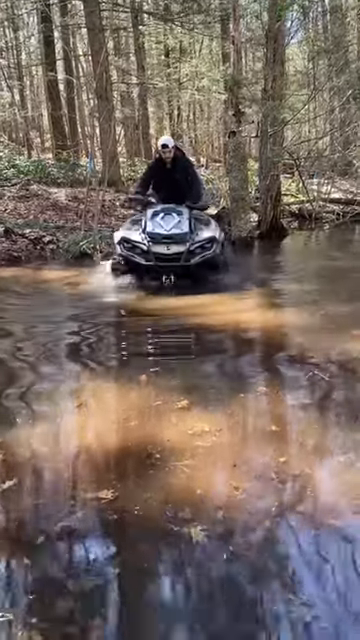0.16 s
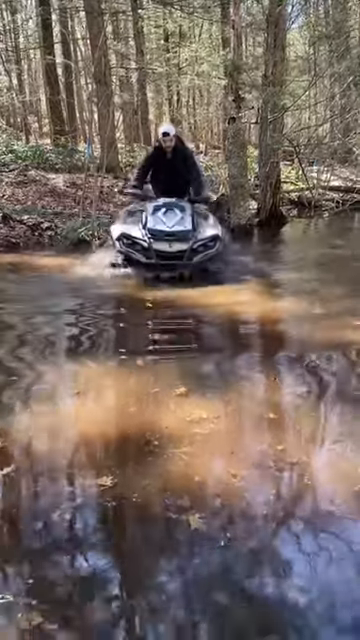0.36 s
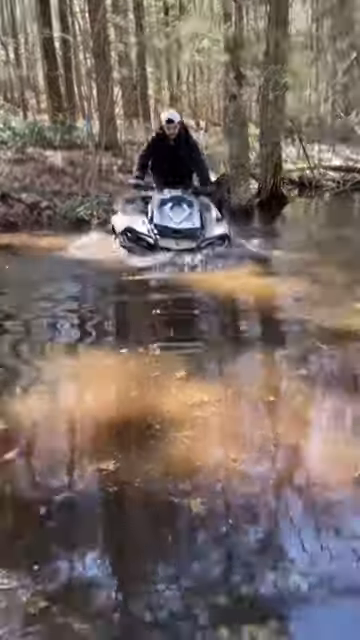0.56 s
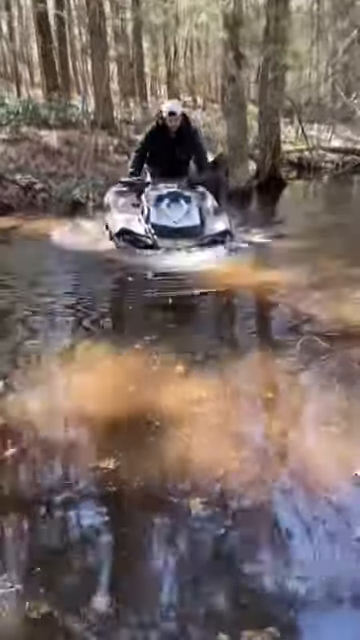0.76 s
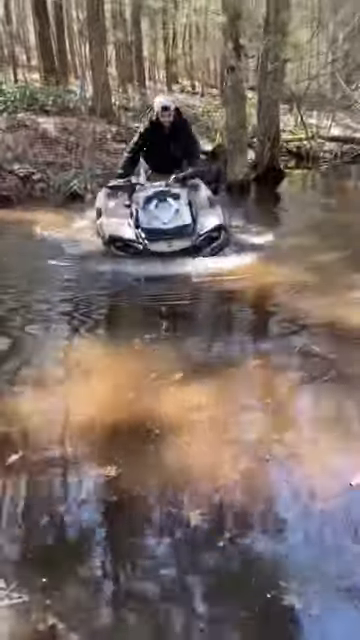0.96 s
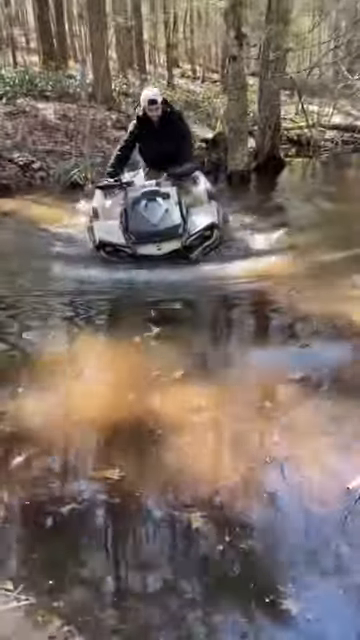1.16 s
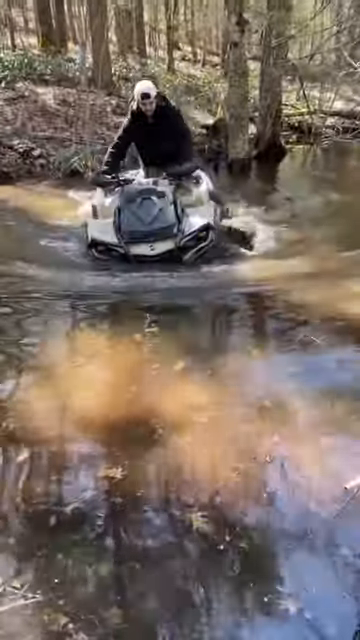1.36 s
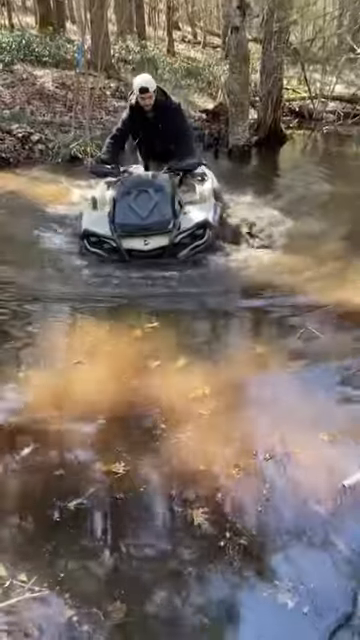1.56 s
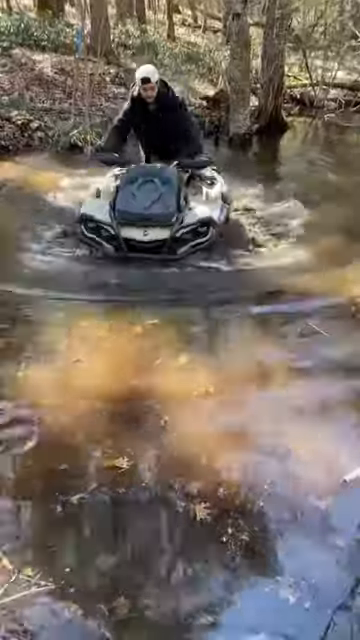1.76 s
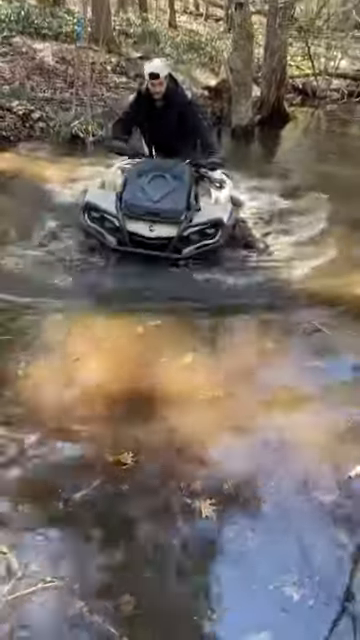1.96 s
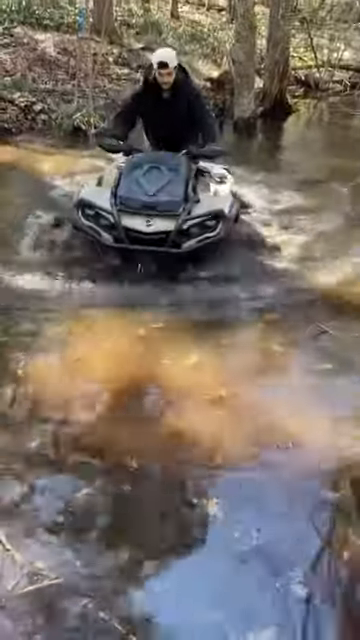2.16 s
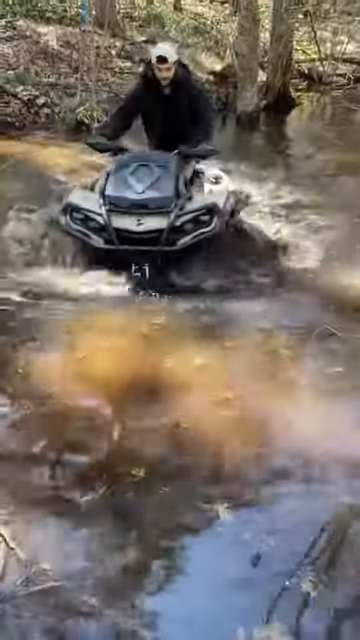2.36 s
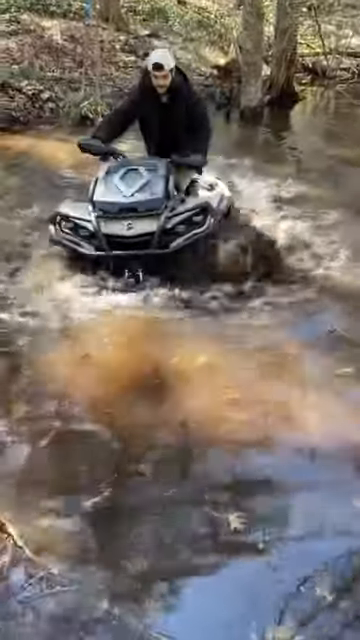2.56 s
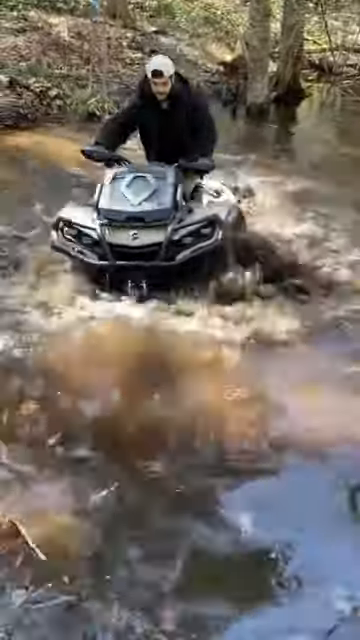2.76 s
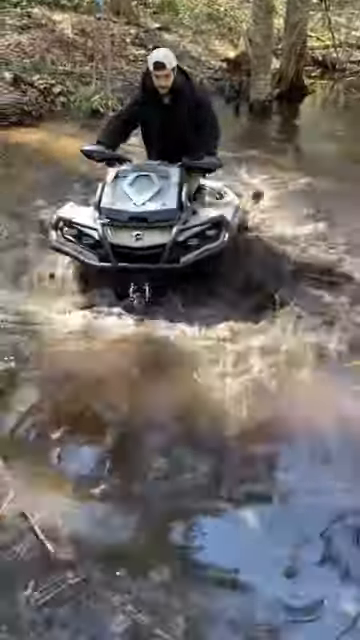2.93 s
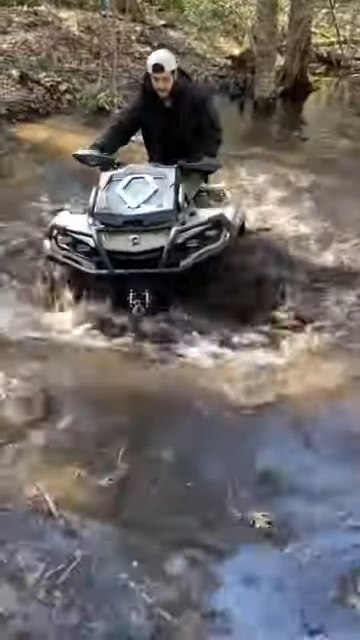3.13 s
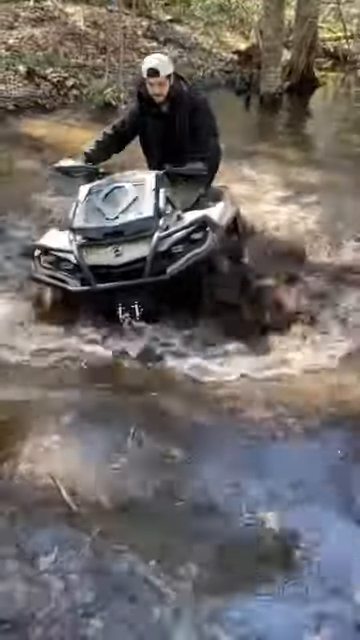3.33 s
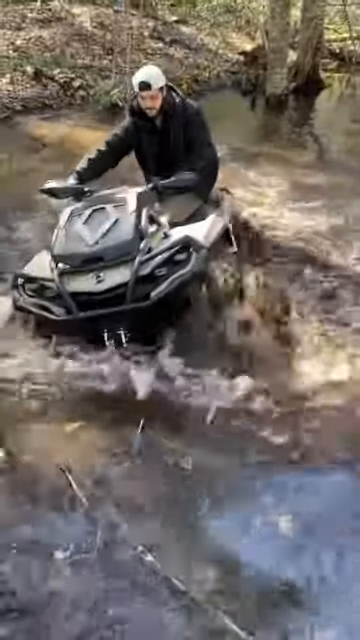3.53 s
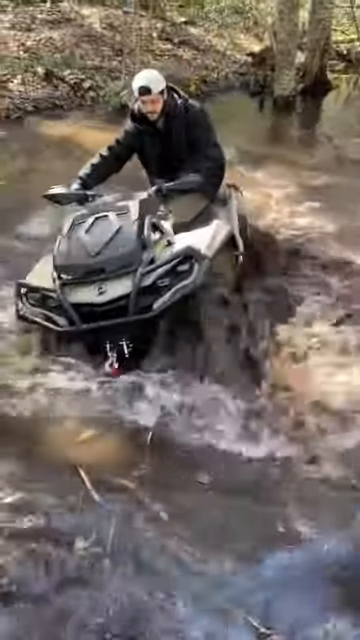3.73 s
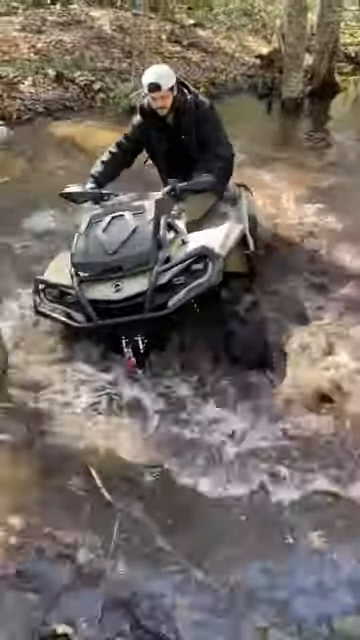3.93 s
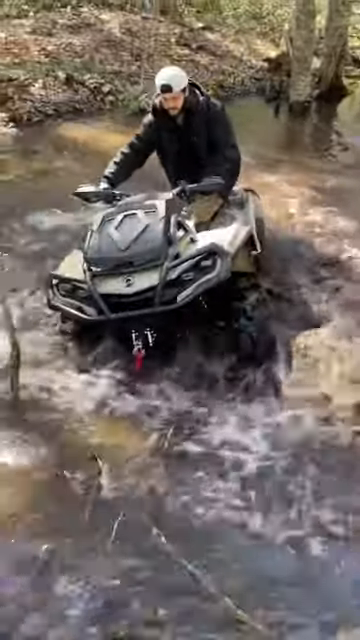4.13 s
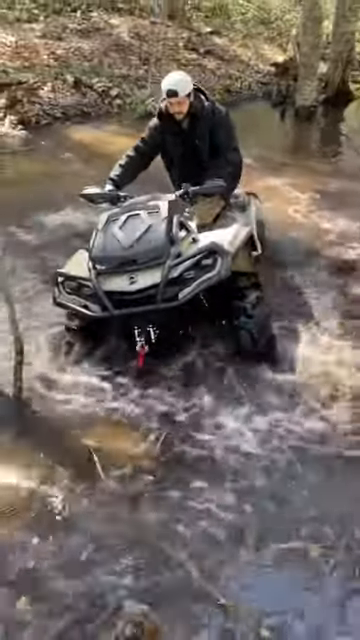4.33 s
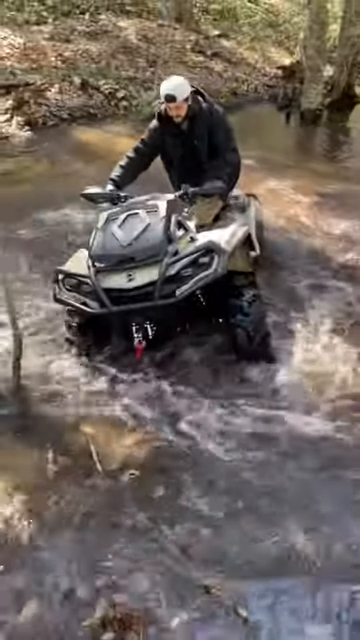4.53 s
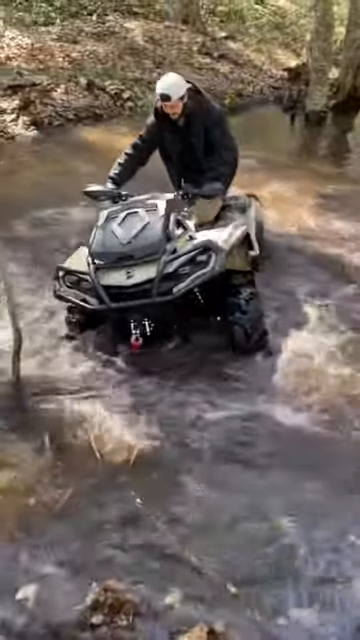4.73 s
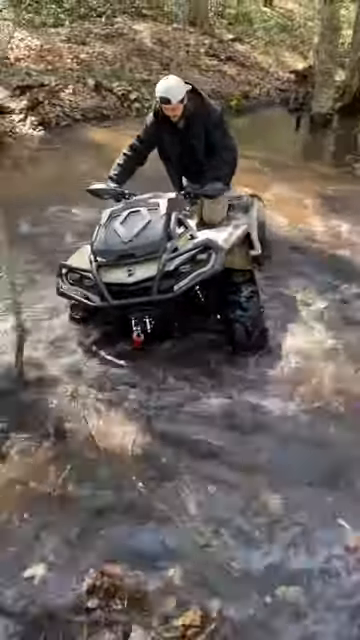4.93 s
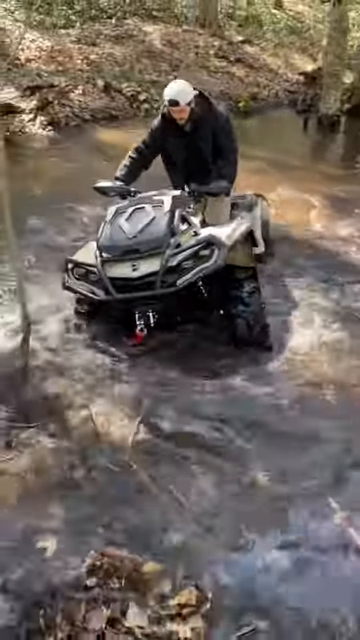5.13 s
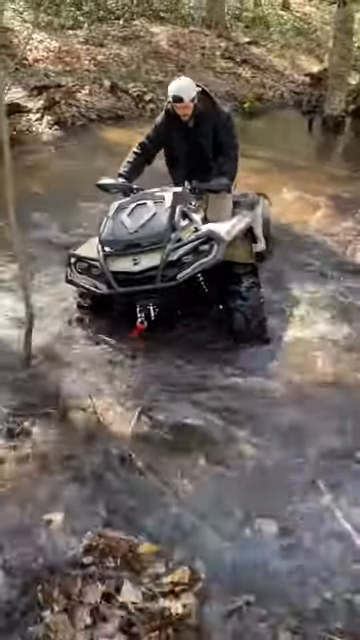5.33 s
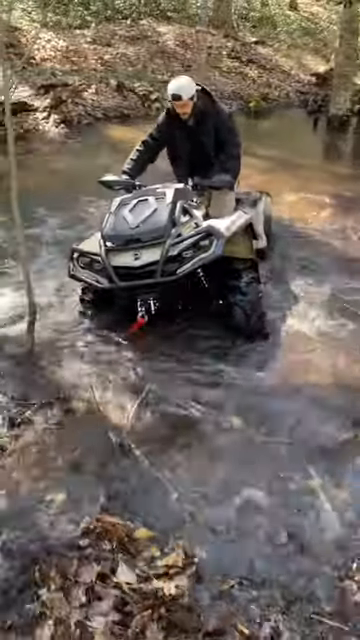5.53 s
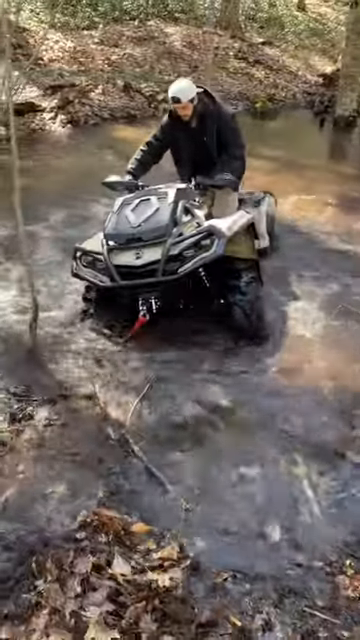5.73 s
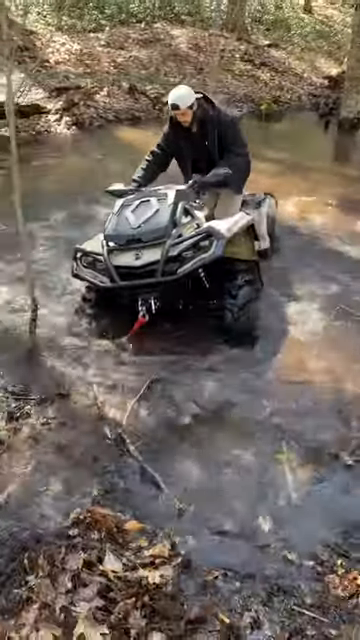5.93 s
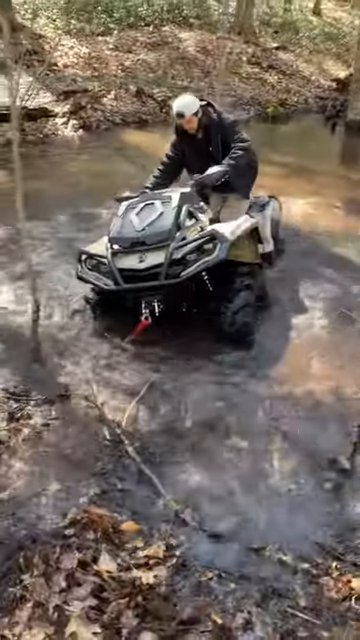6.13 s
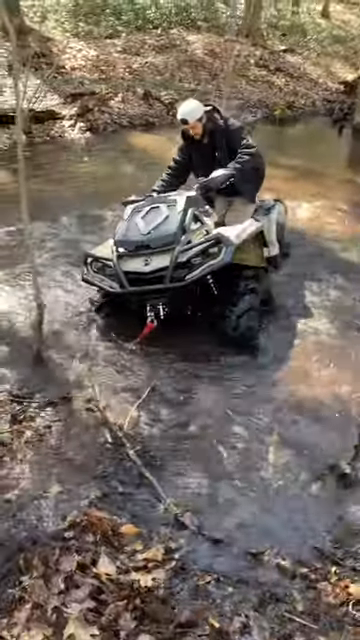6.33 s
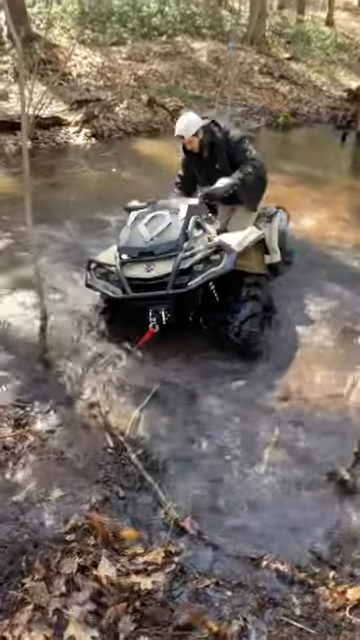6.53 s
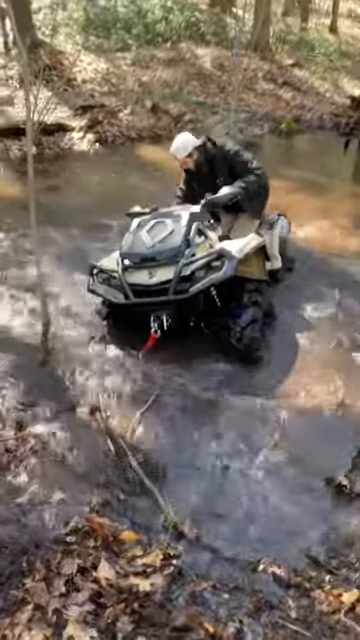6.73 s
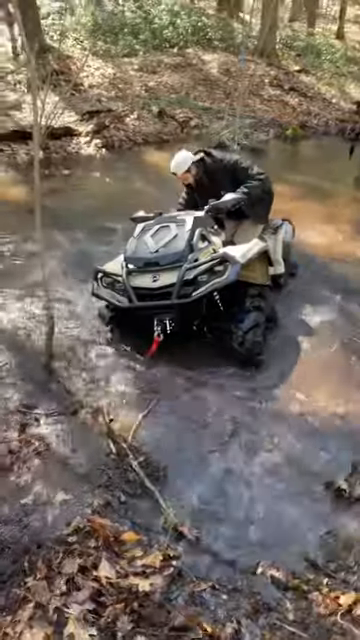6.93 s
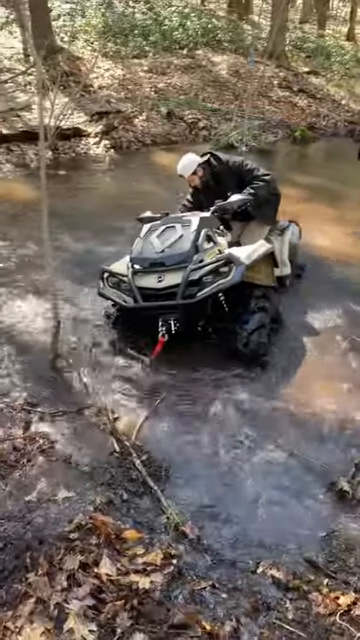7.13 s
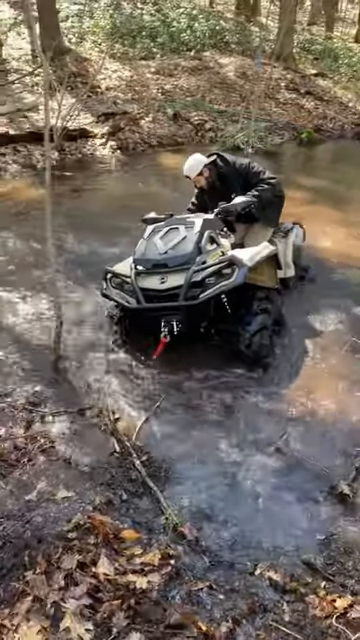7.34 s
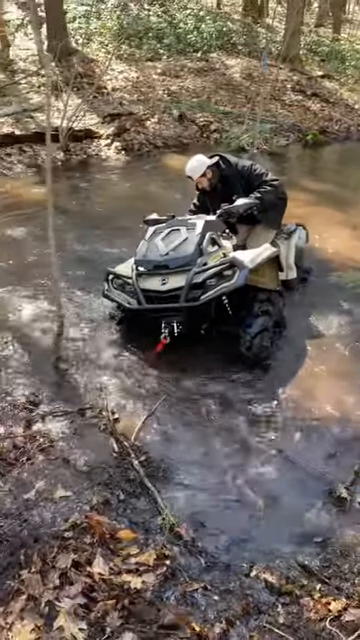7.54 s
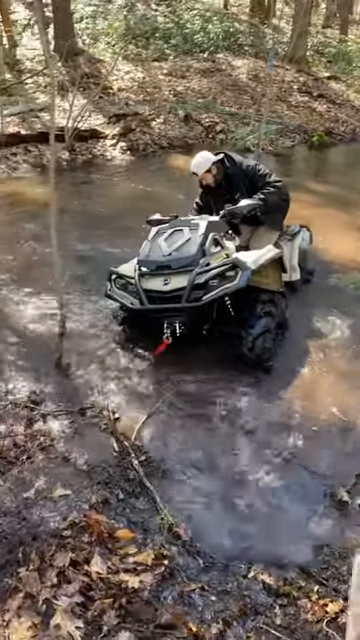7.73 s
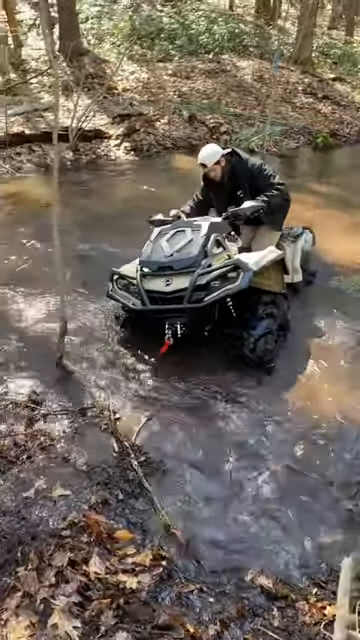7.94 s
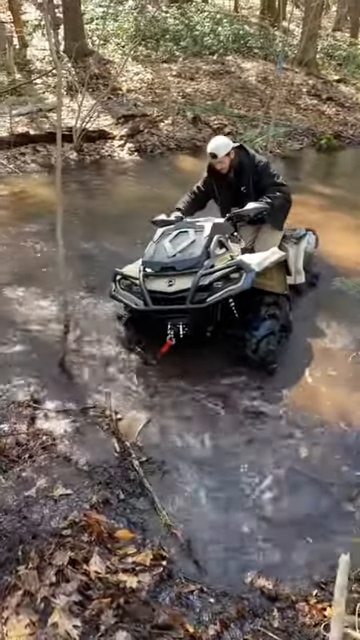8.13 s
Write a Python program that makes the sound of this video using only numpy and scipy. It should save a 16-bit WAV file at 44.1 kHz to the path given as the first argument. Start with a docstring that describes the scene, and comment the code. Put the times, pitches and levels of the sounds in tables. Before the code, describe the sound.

A rough twin-cylinder engine revs and surges nearer through splashing water, cuts back to slow underwater glugs, and ends with gear lever clunks.

```python
"""A V-twin quad bike fords a shallow creek in the woods, nearing the microphone with blips of the throttle.
Its exhaust is a sum of orders of the engine cycle; knocks and hiss ring the casing. Then the throttle
closes and the idling engine sends slugs of gas, made of rising bubbles, out of the drowned pipe.
The wheels' bow wave is flickering noise, bubbles and drops; it drains away and slaps against the body.
Behind it lie dull echoes from trunks and banks and the low rush of the creek."""
import sys
import numpy as np
from scipy import signal
from scipy.fft import rfft, irfft
from scipy.io import wavfile

SR = 44100
rng = np.random.default_rng(int(sys.argv[2]) if len(sys.argv) > 2 else 0)


def store_pcm(level_fs):
    """Save levels as 16-bit WAV."""
    pcm = np.round(np.clip(level_fs, -1, 1) * 32767).astype(np.int16)
    wavfile.write(sys.argv[1], SR, np.atleast_2d(pcm).T)


N = 365588
TIME = np.arange(N) / SR

# engine speed: t/s, speed [four-stroke cycles per s]
ENGINE_SPEED = [(0, 23.69), (.15, 25.26), (.39, 27.98), (.61, 28.84), (.76, 27.75), (.94, 28.07),
                (1.15, 33.73), (1.28, 34.96), (1.43, 30.8), (1.55, 29.34), (1.7, 31.97), (1.88, 36.0),
                (2.08, 33.12), (2.3, 37.37), (2.5, 36.87), (2.6, 34.19), (2.76, 28.99), (2.89, 31.87),
                (3.05, 33.49), (3.2, 34.05), (3.3, 33.4), (3.42, 25), (3.55, 15), (3.68, 18.3),
                (3.85, 19.5), (4.02, 16.5), (4.16, 12), (4.35, 12.2), (4.85, 10.5), (5.4, 10.6),
                (5.9, 9.65), (6.15, 10.2), (6.33, 11.8), (6.53, 9), (6.73, 10.6), (6.93, 10.4), (7.1, 11.7),
                (7.3, 10.4), (8.29, 10.4)]
# exhaust gas boiling up through the water, before gains: t/s, rumble level/dB, gurgle level/dB
GAS_BOILING = [(0, -44, -30), (1.6, -35, -27.5), (2.5, -23, -22.5), (3.3, -19, -23.5), (3.58, -28, -28.5),
               (3.83, -21, -20), (4.1, -30, -23), (4.26, -37.5, -28), (4.36, -29, -25.5), (4.44, -31, -36),
               (4.53, -24, -29), (4.85, -19.5, -28), (5.45, -26.5, -29.5), (5.75, -25.5, -30),
               (5.85, -31.5, -37), (6.3, -29.5, -32), (6.8, -27, -31), (7.4, -29.5, -31.5),
               (8.29, -29.5, -32)]


def from_db(db):
    """Amplitude ratio of a level in dB."""
    return 10 ** (np.asarray(db) / 20)


def rms_one(x):
    """Scale a sound to rms 1."""
    return x / np.sqrt(np.mean(x ** 2) + 1e-20)


def in_time(rows):
    """Each column of a curve, joined by straight lines."""
    s, *columns = np.transpose(rows)
    return [np.interp(TIME, s, c) for c in columns]


def at_hz(points, hz):
    """A spectrum read on a log-frequency axis."""
    points = np.array(points)
    return np.interp(np.log(hz), np.log(points[:, 0]), points[:, 1])


def drift(rate):
    """Random wandering of rms 1: noise smoothed by two equal poles at rate, in Hz."""
    step = 40  # samples between the points of the slow curve
    r = np.exp(-2 * np.pi * step * rate / SR)
    noise = rng.standard_normal(N // step + 2002)
    slow = signal.lfilter([1], [1, -2 * r, r * r], noise)[2000:]  # drop the filter's start
    return np.interp(np.arange(N) / step, np.arange(len(slow)), rms_one(slow))


def band(x, low_hz, high_hz, order=2):
    """Butterworth band-pass."""
    edges = [low_hz, min(high_hz, SR / 2 - 500)]
    return signal.sosfilt(signal.butter(order, edges, "band", fs=SR, output="sos"), x)


def resonate(x, hz, width):
    """A resonance with gain 1 on top."""
    r = np.exp(-np.pi * width / SR)
    zeros = np.array([1, 0, -1]) * (1 - r * r) / 2
    poles = [1, -2 * r * np.cos(2 * np.pi * hz / SR), r * r]
    return signal.lfilter(zeros, poles, x + 1e-18)


def add(out, s, sound):
    """Mix a short sound in at time s."""
    at = int(s * SR)
    out[..., at:at + sound.shape[-1]] += sound[..., :N - at]


def hump(s, length_s):
    """A smooth rise and fall about time s, length_s wide at half height."""
    return np.exp(-np.log(2) * (2 * (TIME - s) / length_s) ** 2)


def bubble(hz, t60, swell_s, rise):
    """A pocket of gas swells and rings down; with rise above 0 it climbs in pitch as it nears the surface."""
    t = np.arange(int(1.5 * t60 * SR)) / SR
    envelope = (1 - np.exp(-(t / swell_s) ** 2)) * from_db(-60 * t / t60)
    return envelope * np.sin(2 * np.pi * hz * t * (1 + rise * t / t60))


def bubbling(low_hz, high_hz, per_s, cycles, spread_db, slope_db, count):
    """Random bubbles of many sizes, each ringing for some cycles; slope_db per octave; rms 1."""
    out = 0
    for hz in np.geomspace(low_hz, high_hz, count):
        born = np.flatnonzero(rng.random(N) < per_s / count / SR)
        size_db = spread_db * np.minimum(rng.exponential(1, len(born)), 4)
        kicks = np.zeros(N)
        kicks[born] = from_db(size_db) * rng.choice([-1, 1], len(born))
        ringing = rms_one(resonate(kicks, hz, hz / cycles))
        out = out + ringing * from_db(slope_db * np.log2(hz / low_hz))
    return rms_one(out)


def rushing(spectrum, patchy_db, flicker_rate):
    """Stereo noise in third-octave bands, flickering alone and together, each as wide as its likeness; rms 1."""
    # left-right likeness: f/Hz, correlation [1 = same in both channels]
    likeness = [(400, 0.97), (1300, 0.98), (2800, 0.76), (5400, 1), (10000, 1)]
    out, together = 0, drift(flicker_rate)
    edges = 2 ** np.arange(np.log2(spectrum[0][0]), np.log2(spectrum[-1][0]) + .1, 1 / 3)
    white = rng.standard_normal((2, 2, N))
    for k, (low, high) in enumerate(zip(edges, edges[1:])):
        mid, side = band(white[k % 2], low, high)
        hz = np.sqrt(low * high)
        alike = np.clip(at_hz(likeness, hz), -1, 1)
        flicker_db = patchy_db * (.5 * together + drift(flicker_rate))
        gain = from_db(at_hz(spectrum, hz) + flicker_db)
        out = out + gain * (np.sqrt(1 + alike) * mid + np.sqrt(1 - alike) * side * [[1], [-1]])
    return rms_one(out)


def crank():
    """Engine cycles turned so far: the running sum of the speed."""
    return .27 + np.cumsum(in_time(ENGINE_SPEED)[0]) / SR


def exhaust(turns, bark_skew=-0.68, rough_db=1.6):
    """Pressure bursts once a cycle: a clean low throb, and a rough bark that grows with speed."""
    # make-up of the bark: order, shallow-water level/dB, deep-water level/dB
    bark_orders = [(7, -13, -12), (8, 0, 1), (9, -4.5, -1), (10, -16.5, -3), (11, -8, -1.5),
                   (12, -15, -9.5), (13, -17, -13), (14, -17, -10.5), (16, -19, -21), (17, -19.5, -16.5)]
    # how hard the exhaust blows: t/s, throb level/dB, bark level/dB
    effort = [(0, -1, 5), (.35, -1.5, -3.5), (.6, -0.5, -0.5), (.85, 0, 1), (1.6, 1, -1), (1.85, 1, 1),
              (2.05, -1, -2.5), (2.3, 0, 0.5), (2.55, -5.5, 0), (2.75, -2.5, -1.5), (3.28, -3, 0),
              (3.38, -6.5, -1), (3.44, -7, -2), (3.6, -18.5, -2), (3.71, -10, -1), (3.85, -9, 4.5),
              (4.07, -15, 4), (4.2, -23, 0), (4.5, -45, -25)]
    cruise_speed = 32  # cycles per s
    bark_level_db, bark_per_speed_db = -21.5, 0.62  # at cruise, before effort; per cycle a second
    valley_hz, valley_width_hz, valley_db = 251.5, 17.7, 4.5  # the silencer swallows part of the bark
    throb_swamped_share = 0.3  # share of a swamping's loss in dB that the throb suffers too

    speed, clear_db = in_time(ENGINE_SPEED)[0], swells()
    low = throb(turns, speed) * from_db(throb_swamped_share * np.minimum(clear_db, 0))
    # as the quad wades deeper the bark fills out, and water at the pipe's mouth shakes it
    depth = np.interp(TIME, [.9, 2.5], [0, 1])
    shake = .15 + .3 * depth  # radians
    bark, power = 0, 0
    for k, shallow_db, deep_db in bark_orders:
        swallowed_db = valley_db * np.exp(-((k * speed - valley_hz) / valley_width_hz) ** 2)
        gain = from_db(shallow_db + depth * (deep_db - shallow_db) - swallowed_db)
        phase = 2 * np.pi * round(k) * turns + bark_skew + shake * drift(21)
        bark = bark + gain * from_db(rough_db * drift(8.9)) * np.cos(phase)
        power = power + gain ** 2 / 2
    bark = bark / np.sqrt(power)
    speed_db = bark_level_db + bark_per_speed_db * (speed - cruise_speed)
    bark = bark * from_db(speed_db + clear_db + depth * rough_db * drift(20.5))
    throb_db, bark_db = in_time(effort)
    return from_db(throb_db) * low + from_db(bark_db) * bark


def throb(turns, speed, skew=3.02, smear=0.37, wander_db=0.7, wading_wander_db=1.2):
    """Low orders glide through the pipe's response, its hollow and the gas pocket; the pipe smears each burst."""
    # the uneven firing favours some orders: order, level/dB
    throb_orders = [(2, 4), (3, -1.5), (4, 0), (5, -1), (6, -0.5)]
    # response of the exhaust pipe: f/Hz, level/dB
    pipe_response = [(32, -53), (58, -24), (73, -20.5), (82, -21.5), (94, -17), (120, -17.5), (160, -17.5),
                     (184, -21), (205, -18), (230, -21.5)]
    # hollow in the pipe's note while the quad wades: t/s, f/Hz, depth/dB
    hollow_curve = [(.9, 129, 4), (1.1, 125, 8), (1.55, 117.6, 11), (2, 117.5, 11), (2.4, 113, 11),
                    (2.56, 108, 12), (2.7, 119, 8), (3.3, 118, 10)]
    # resonance of the gas pocket at the pipe's mouth: t/s, f/Hz, level/dB
    pocket_curve = [(2.1, 145, -4), (2.4, 148, 5.5), (2.56, 142, 6.5), (2.68, 183, 4.5), (3.05, 168, 6.5),
                    (3.3, 166, 7), (3.36, 135, 1), (3.44, 92, 6.5), (3.53, 64, 10), (3.83, 76.4, 13),
                    (4.15, 67, 12)]
    hollow_width_hz, pocket_width_oct = 7, 0.24
    wade_from_s = 1.0  # the pipe goes under water

    wading = np.clip((TIME - wade_from_s) / 0.08 + .5, 0, 1)
    hollow_hz, hollow_db = in_time(hollow_curve)
    pocket_hz, pocket_db = in_time(pocket_curve)
    out = 0
    for k, db in throb_orders:
        hz = round(k) * speed
        hollow = hollow_db * np.exp(-((hz - hollow_hz) / hollow_width_hz) ** 2)
        pocket = pocket_db * np.exp(-(np.log2(hz / pocket_hz) / pocket_width_oct) ** 2)
        wander = (wander_db + wading * (wading_wander_db - wander_db)) * drift(9.0)
        gain = from_db(db + at_hz(pipe_response, hz) - hollow + pocket + wander)
        out = out + gain * np.cos(2 * np.pi * round(k) * turns + skew + smear * (k - 4) ** 2)
    return np.sqrt(2) * out


def swells():
    """Decibels gained or lost, in smooth humps, as the pipe's mouth lifts clear of the water or is swamped."""
    # lifted (+) or swamped (-): middle t/s, length at half height [s], level/dB
    mouth_swells = [(1.26, 0.14, -14), (2.437, 0.033, -14), (2.588, 0.11, -13.5), (2.794, .07, 1),
                    (2.91, 0.07, 5), (2.98, 0.055, -10), (3.064, 0.047, 8.5), (3.14, 0.08, -12),
                    (3.268, 0.065, 8), (3.35, 0.078, -10)]
    return sum(db * hump(s, length) for s, length, db in mouth_swells)


def rasp(turns, second_turn=.36, second_db=-4, sharpness=1.14, echo_share=0.39):
    """The two cylinders fire unevenly; each firing knocks the casing and lets out a puff of hiss."""
    # mechanical rasp of the engine, before a 1 dB cut: t/s, level/dB
    rasp_level = [(0, -30.5), (1.1, -31), (1.5, -33), (1.88, -28), (3.25, -28), (3.6, -38.5), (4.5, -56),
                  (8.29, -47)]
    # resonances of the engine and its covers: f/Hz, width/Hz, level/dB
    casing_modes = [(410, 110, 2.5), (746, 260, -2.5), (1070, 220, 0), (1313, 256, -9), (2070, 360, -18.5),
                    (3660, 130, -27.5)]
    # the engine's echo lags more as it comes nearer: t/s, lag/s
    echo_lag = [(0, 0.0017), (1.7, 0.0024), (3.5, 0.0035), (8.29, 0.0037)]

    force = 0
    for lag, db in [(0, 0), (second_turn, second_db)]:
        fired = np.floor(turns - lag)
        knocks = np.diff(fired, prepend=fired[0]) * from_db(.8 * drift(30))
        puff = np.exp(sharpness * (np.cos(2 * np.pi * (turns - lag)) - 1))
        force = force + from_db(db) * (knocks + .045 * puff * rng.standard_normal(N))
    # knocks and hiss rattle round the frame, alike on every cycle
    frame = rng.standard_normal(SR // 30) * from_db(-60 * TIME[:SR // 30] / 0.2)
    force = signal.fftconvolve(force, frame)[:N]
    ringing = 0
    for k, (hz, width, db) in enumerate(casing_modes):
        ringing = ringing + (-1) ** k * from_db(db) * resonate(force, hz, width)
    # the echo cuts notches that slide down as the quad approaches
    echo = np.interp(TIME - in_time(echo_lag)[0], TIME, ringing)
    return rms_one(ringing - echo_share * echo) * from_db(in_time(rasp_level)[0] - 1.0)


def singing(turns, waver=.75, flutter_db=3):
    """Single high orders swell and fade as the speed sweeps them through resonances of the frame."""
    # orders that sing out: order, middle t/s, length at half height [s], level/dB
    sung_orders = [(42, 0.056, 0.13, -39), (51, 0.29, 0.24, -43.5), (28, 0.53, 0.23, -41),
                   (26, 0.86, 0.29, -37), (42, .92, 0.45, -42), (30, 1.25, .15, -38),
                   (44, 1.614, 0.093, -41), (17, 1.89, .15, -31.5), (29, 1.9, .25, -37),
                   (14, 2.2, .12, -31.5), (16, 2.42, .15, -35), (14, 3.05, .1, -30)]
    level = {}
    for k, s, length, db in sung_orders:
        level[round(k)] = level.get(round(k), 0) + from_db(db) * hump(s, length)
    out = 0
    for k, gain in level.items():
        phase = 2 * np.pi * k * turns + waver * drift(23)
        out = out + gain * from_db(flutter_db * drift(20)) * np.cos(phase)
    return np.sqrt(2) * out


def whine(width_hz=70):
    """The drive belt sings in a narrow, unsteady band."""
    # whine of the belt: t/s, f/Hz, level/dB
    belt_whine = [(0, 3470, -60), (.6, 3500, -56), (.85, 3400, -46), (1.02, 3553, -56), (2.05, 3590, -68),
                  (2.6, 3470, -90)]
    hz, db = in_time(belt_whine)
    phase = 2 * np.pi * np.cumsum(hz) / SR
    return from_db(db) * (drift(width_hz) * np.cos(phase) + drift(width_hz) * np.sin(phase))


def chugs(turns, scatter=0.028, late_s=0.0012, glug_slope_db=-3.0):
    """Off the throttle the gas leaves the drowned pipe in uneven slugs, one a cycle, each a boom and a glug."""
    # what a slug's boom rings with: f/Hz, level/dB, t60/s
    boom_modes = [(60.6, -1, 0.16), (82.8, 2, 0.24)]
    # what its glug rings with, before the slope: f/Hz, level/dB, t60/s
    glug_modes = [(162.8, 2.5, 0.12), (234.4, -3, 0.07), (290, -12, 0.036), (412, -11, 0.041)]
    slug_beat_s = 4.962  # a cycle starts here
    slugs_from_s = 4.05  # the engine has slowed enough for separate slugs
    slug_boom_db, slug_glug_db = 13.5, 10.5  # above the boiling's tabled rumble and gurgle
    slug_uneven_db = 0.8  # spread from slug to slug
    limp_from_s, limp_db = 6.1, 3  # late in the idle, strong and weak slugs take turns

    out = np.zeros(N)
    rumble_db, gurgle_db = in_time(GAS_BOILING)
    cycle = np.floor(turns - np.interp(slug_beat_s, TIME, turns))
    starts = np.flatnonzero((np.diff(cycle) > 0) & (TIME[1:] > slugs_from_s)) + 1
    luck = rng.standard_normal((len(starts), 9))
    for at, (late, boom_luck, glug_luck, *sizes) in zip(starts, luck):
        s = TIME[at] + late_s * late
        limp = limp_db * (s > limp_from_s) * (1 if cycle[at] % 2 else -1)
        boom_db = rumble_db[at] + slug_boom_db + limp + slug_uneven_db * boom_luck
        glug_db = gurgle_db[at] + slug_glug_db + limp + slug_uneven_db * glug_luck
        for (hz, db, t60), size in zip(boom_modes, sizes):
            boom = bubble(hz * np.exp(scatter * size / 2), t60, swell_s=0.016, rise=0.0068)
            add(out, s - .014, from_db(boom_db + db) * boom)
        for (hz, db, t60), size in zip(glug_modes, sizes[2:]):
            slope_db = glug_slope_db * np.log2(hz / glug_modes[0][0])
            glug = bubble(hz * np.exp(scatter * size), t60, swell_s=0.0034, rise=0.053)
            add(out, s, from_db(glug_db + db + slope_db) * glug)
    return out


def churn(rumble_gain_db=-5.0, gurgle_gain_db=-2):
    """Around the slugs the exhaust boils up in random big and small bubbles."""
    rumble_db, gurgle_db = in_time(GAS_BOILING)
    rumble = bubbling(61.7, 83.6, per_s=140, cycles=9.5, spread_db=1.0, slope_db=-2.0, count=3)
    gurgle = bubbling(152.7, 429.0, per_s=170, cycles=9.8, spread_db=3.0, slope_db=-9, count=10)
    return (from_db(rumble_db + rumble_gain_db) * rms_one(band(rumble, 45, 140))
            + from_db(gurgle_db + gurgle_gain_db) * rms_one(band(gurgle, 117, 586)))


def bursts(pop_db=0, pop_t60=0.034, overtone=1.91, overtone_db=-4, plink_db=0, plink_t60=0.031):
    """Big bubbles burst with a short, deep pop; large drops fall back with a plink."""
    # big bubbles bursting at the surface: t/s, level/dB, f/Hz
    pop_times = [(4.073, -12, 153), (5.153, -18, 168), (5.247, -19, 157), (5.342, -16, 159),
                 (5.494, -16, 167), (5.727, -16, 164), (6.15, -11.5, 186), (6.221, -28, 159),
                 (6.546, -14, 182), (6.617, -16, 162), (6.808, -17, 163), (6.958, -15, 144),
                 (7.557, -21, 162), (8.13, -19, 160)]
    # single drops that stand out: t/s, level/dB, f/Hz
    plink_times = [(4.942, -37, 3900), (4.99, -33, 2200), (5.021, -27, 1700), (5.04, -37, 5000),
                   (5.157, -32, 2010), (5.213, -37, 3630), (5.511, -33, 2980), (5.62, -38, 4000),
                   (6.082, -31, 1400), (6.207, -32, 2160)]
    out = np.zeros(N)
    for s, db, hz in pop_times:
        deep = bubble(hz, pop_t60, swell_s=0.00194, rise=0.11)
        upper = bubble(hz * overtone, pop_t60, swell_s=0.0027, rise=0.087)
        add(out, s, from_db(db + pop_db) * (deep + from_db(overtone_db) * upper))
    for s, db, hz in plink_times:
        add(out, s, from_db(db + plink_db) * bubble(hz, plink_t60, swell_s=0.00089, rise=0.075))
    return out


def clunks(gain_db=0, attack_s=0.0013, tail_db=-16, tail_t60=0.37):
    """The gear lever clunks home: dying noise rings the gearbox, then a faint rattle of the frame."""
    # clunks, before gain: t/s, level/dB, t60/s, tilt [dB per octave]
    clunk_times = [(7.15, -28, 0.08, -1.5), (7.201, -21.5, 0.13, -1), (7.239, -28.5, 0.17, 1.5),
                   (7.306, -22.5, 0.085, 0), (7.343, -36, 0.087, 3), (7.428, -30, .05, -3),
                   (7.443, -32, 0.098, 0), (7.51, -36, .1, -1)]
    # what the gearbox rings with: f/Hz, width/Hz, level/dB
    gearbox_modes = [(235, 56, 2), (380, 96, -2.5), (515, 78, 1.5), (654, 65, 6), (790, 60, -1),
                     (990, 160, -3), (1420, 210, -8.5), (1750, 190, -9), (2130, 320, -13),
                     (3600, 2200, -29)]
    pivot_hz = 700  # a clunk's colour tilts about this pitch
    out, t = np.zeros(N), TIME[:SR // 2]
    power = sum(from_db(db) ** 2 * np.pi * width / SR for _, width, db in gearbox_modes)
    for s, db, t60, tilt_db in clunk_times:
        decay = from_db(-60 * t / t60) + from_db(tail_db - 60 * t / tail_t60)
        envelope = decay * (1 - np.exp(-t / attack_s))
        force = from_db(db) * envelope * rng.standard_normal(len(t))
        for k, (hz, width, mode_db) in enumerate(gearbox_modes):
            gain = (-1) ** k * from_db(mode_db + tilt_db * np.log2(hz / pivot_hz))
            add(out, s, gain * resonate(force, hz, width))
    return from_db(gain_db) * out / np.sqrt(power)


def bow_wave(wash_gain_db=6.0, bubbles_db=0.2, drops_db=-2, spray_gain_db=2.5, fizz_db=-23):
    """Water churned by the wheels: a wash full of bubbles and drops, and fizzing spray."""
    # the bow wave, before gains: t/s, wash level/dB, spray level/dB
    wave_level = [(0.0, -37, -47), (0.32, -36.5, -41.5), (0.64, -39.5, -47.5), (1.31, -42.5, -48),
                  (1.71, -41.5, -47.5), (2.7, -33, -36.5), (3.12, -33, -37.5), (3.58, -33.5, -34),
                  (4.48, -43.5, -48), (6.14, -49.5, -53.5), (7.92, -50, -57), (8.29, -49, -57)]
    # bubbles and drops stand out of the wash as it nears and drains: t/s, level/dB (before gains)
    trickle_level = [(0, -11), (1.8, -8), (3.3, -1.5), (4.3, 0), (5.1, 1.5), (8.29, 0)]
    # colour of the wash, then of the spray: f/Hz, level [dB per Hz]
    wash_colour = [(350, 4.5), (500, 1), (750, -2.5), (1000, -7), (1500, -5.5), (2100, -8.5), (2700, -16.5),
                   (3500, -18)]
    spray_colour = [(2200, -30), (2900, -2), (3500, 3), (5200, 3.5), (6400, 0), (8000, -8), (11000, -1.5),
                    (13000, -4), (16000, -13)]

    wash_db, spray_db = in_time(wave_level)
    bubbles = bubbling(599.4, 2303, per_s=600, cycles=53.0, spread_db=2.5, slope_db=-5.5, count=20)
    fizz = bubbling(3300, 10500, per_s=1100, cycles=14.0, spread_db=4.5, slope_db=-4.0, count=12)
    trickle = from_db(bubbles_db) * bubbles + from_db(drops_db) * droplets()
    wash = from_db(wash_gain_db) * rushing(wash_colour, patchy_db=2.2, flicker_rate=14)
    wash = wash + from_db(in_time(trickle_level)[0]) * trickle
    spray = from_db(spray_gain_db) * rushing(spray_colour, patchy_db=1.8, flicker_rate=17.5)
    spray = spray + from_db(fizz_db) * fizz
    return from_db(wash_db) * wash + from_db(spray_db) * spray


def droplets(low_hz=800, high_hz=5500, spread_db=2.6, count=1600):
    """Drops fall back and each leaves a rising plink, the small ones higher and fainter; rms 1."""
    out = np.zeros(N)
    for when, small, luck in rng.random((count, 3)):
        hz = low_hz * (high_hz / low_hz) ** small
        db = -spread_db * np.log(luck + 0.034) - 9 * small
        add(out, when * TIME[-1], from_db(db) * bubble(hz, 30 / hz, swell_s=0.00054, rise=0.13))
    return rms_one(out)


def slaps(gulp_t60=0.043, splash_t60=0.2, body_ratio=0.62, body_t60=0.043, body_db=-1, mist_db=-17):
    """A slap traps a pocket of air that rings under a short splash; the body answers with a lower knock."""
    # water slapping and gulping against the body, before gains: t/s, level/dB, gulp f/Hz, splash level/dB
    slap_times = [(3.675, -26, 670, -24), (3.845, -18, 300, -40), (3.9, -16, 335, -40),
                  (3.95, -17, 280, -44), (3.99, -14, 348, -42), (4.03, -20, 270, -44),
                  (4.11, -13, 330, -36), (4.15, -17, 383, -52), (4.32, -20.5, 328, -50),
                  (4.662, -21, 695, -46), (5.587, -21, 496, -42), (5.755, -21, 457, -46),
                  (6.18, -16, 634, -46), (6.577, -19, 473, -40), (6.77, -24, 486, -46),
                  (6.877, -27, 640, -50), (7.704, -29, 577, -40), (8.09, -27, 653, -51),
                  (8.182, -31, 690, -43)]
    out, splash = np.zeros(N), np.zeros(N)
    t = TIME[:SR // 4]
    for s, db, hz, splash_db in slap_times:
        gulp = bubble(hz, gulp_t60, swell_s=0.0013, rise=0.098)
        knock = bubble(hz * body_ratio, body_t60, swell_s=0.0023, rise=0)
        add(out, s, from_db(db + 1.5) * gulp)
        add(out, s, from_db(db + body_db) * knock)
        add(splash, s, from_db(splash_db - 60 * t / splash_t60) * (1 - np.exp(-t / 0.00054)))
    sheet = rms_one(band(band(rng.standard_normal(N), 410, 1740), 204, 1400, order=1))
    mist = rms_one(band(rng.standard_normal(N), 2900, 4500))
    return out + 1.17 * splash * (sheet + from_db(mist_db) * mist)


def swish(s=5.65, db=-45, length_s=0.092):
    """A thin sheet of water slides off the body: a brief hump of high noise."""
    envelope = np.exp(-(2 * (TIME - s) / length_s) ** 2)
    return from_db(db) * envelope * rms_one(band(rng.standard_normal(N), 3700, 6600))


def crackles():
    """Small crackles near the microphone: brief bright ticks of noise."""
    # ticks: t/s, level/dB, t60/s
    crackle_times = [(5.982, -33.5, .02), (5.997, -39, 0.018), (6.045, -38, .015), (7.552, -36, .01),
                     (7.635, -37, .01)]
    level = np.zeros(N)
    for s, db, t60 in crackle_times:
        add(level, s, from_db(db - 60 * TIME[:SR // 4] / t60))
    return level * rms_one(band(rng.standard_normal((2, N)), 2700, 16000))


def woods(x, echo_db=-24, count=8):
    """Trunks and banks send back a few dull echoes, other ones to each side."""
    out, dull = np.zeros((2, N)), band(x, 650, 1300, order=1)
    for k, lag in enumerate(np.sort(rng.uniform(0.015, 0.073, count))):
        add(out[k % 2], lag, dull * from_db(echo_db - 9.4 * lag))
    return out


def creek(db=-34.5):
    """Low rush of the stirred creek: flickering noise, its two channels averaged to mono."""
    # colour of the rush: f/Hz, level [dB per Hz]
    creek_colour = [(25, -14), (40, -1), (60, -2.5), (120, 1), (250, -11), (500, -32)]
    return from_db(db) * rushing(creek_colour, patchy_db=-1.0, flicker_rate=5.7).mean(axis=0)


def treble_out_of_step(x):
    """Parts of the treble are out of step between left and right: the right channel's phase lags."""
    # between the two channels: f/Hz, phase by which the left leads [radians]
    treble_phase = [(0, 0), (2240, .1), (2840, .5), (5600, 0), (6600, 3.14), (8180, 3.14), (8900, 6.28),
                    (11900, 6.28), (12600, 9.42), (14800, 9.42), (15300, 12.57)]
    spectrum = rfft(x)
    lead = np.interp(np.arange(spectrum.shape[1]) * SR / N, *np.transpose(treble_phase))
    turn = .5 * lead * np.array([[1], [-1]]) - .5 * lead  # left 0, right -lead
    return irfft(spectrum * np.exp(1j * turn), N)


def scene():
    """The quad with its echoes, the water and the crackles, as heard in the two channels."""
    turns = crank()
    engine = exhaust(turns) + rasp(turns) + singing(turns) + whine()
    gas = chugs(turns) + churn() + bursts()
    quad = engine + gas + slaps() + clunks(gain_db=5.0)
    water = bow_wave() + swish() + creek()
    return treble_out_of_step(quad + woods(quad) + water + crackles())


def record(dry):
    """Peaks are rounded, the top is cut."""
    cutoff_hz = 15800
    rounded = dry / (1 + np.abs(dry) ** 6) ** (1 / 6)
    return signal.sosfilt(signal.ellip(10, .1, 90, cutoff_hz, fs=SR, output="sos"), rounded)


dry = scene()
out = record(dry)
store_pcm(out)
```